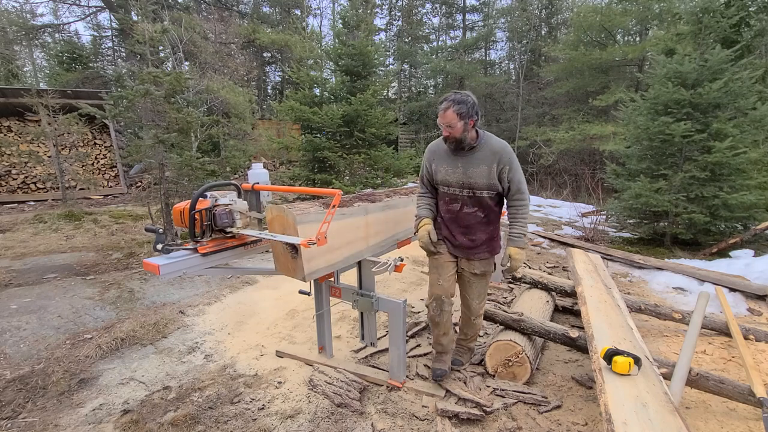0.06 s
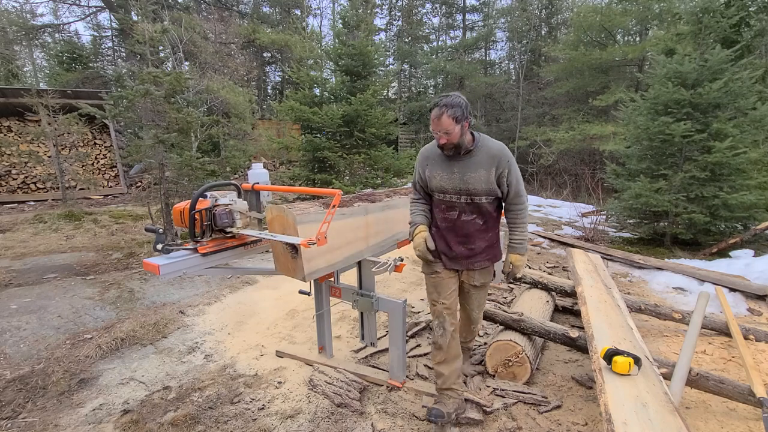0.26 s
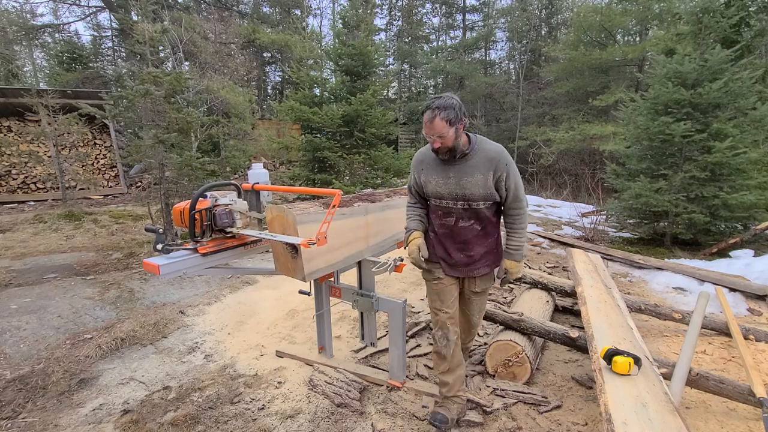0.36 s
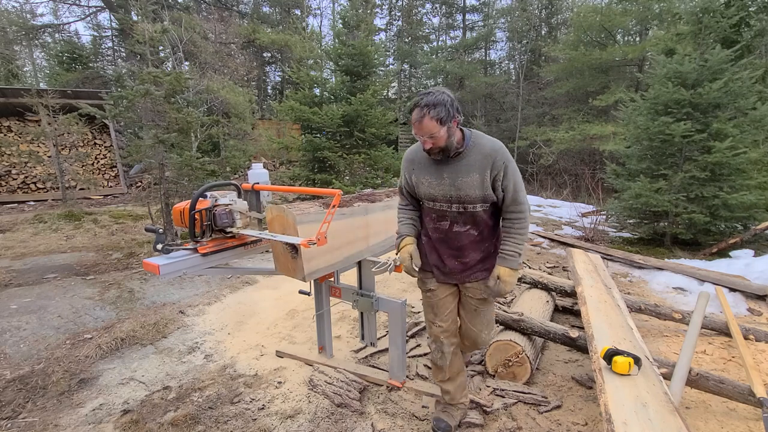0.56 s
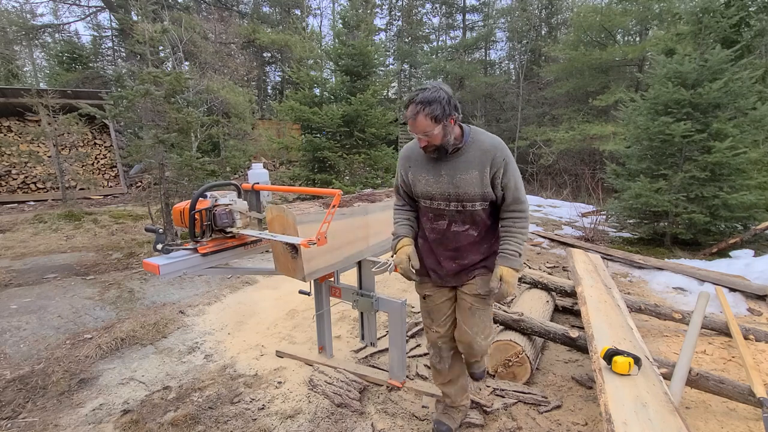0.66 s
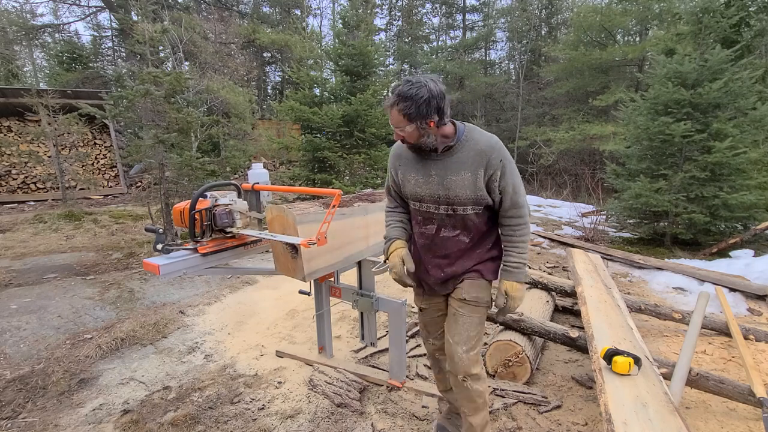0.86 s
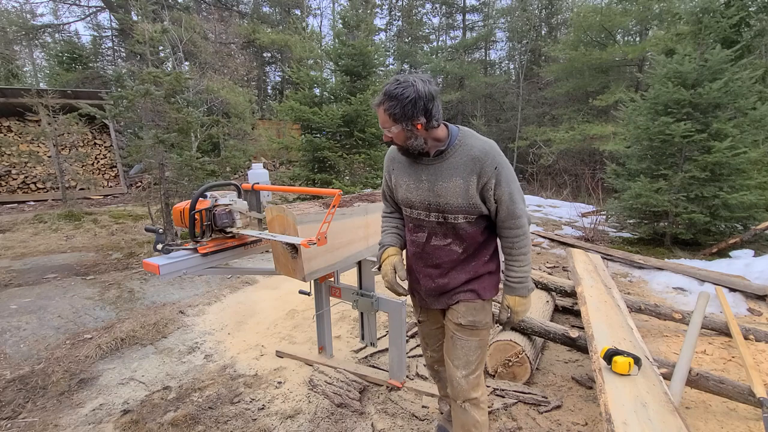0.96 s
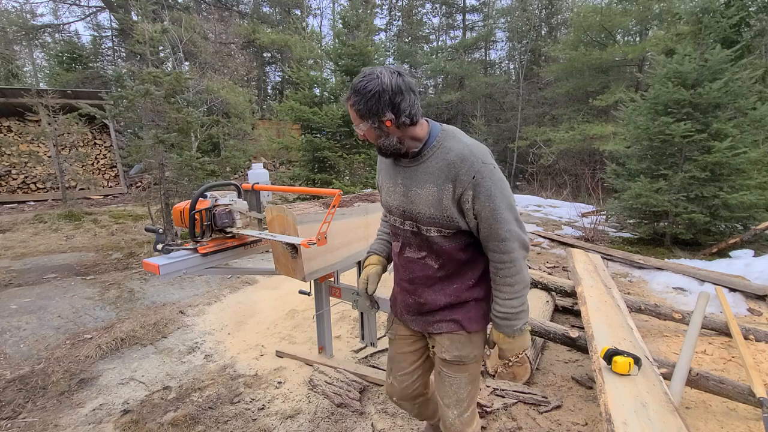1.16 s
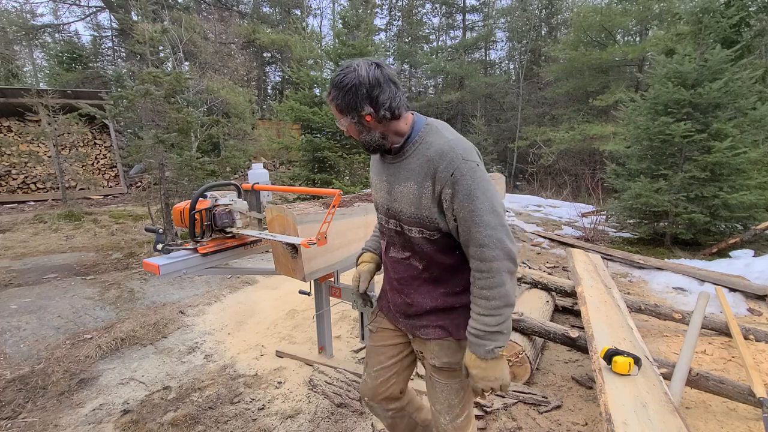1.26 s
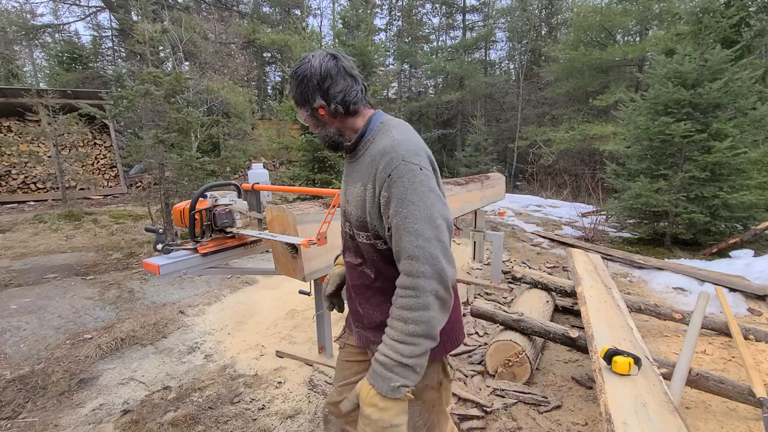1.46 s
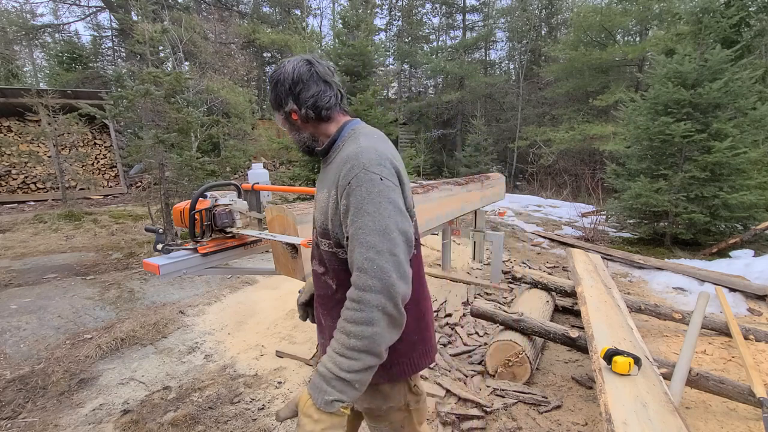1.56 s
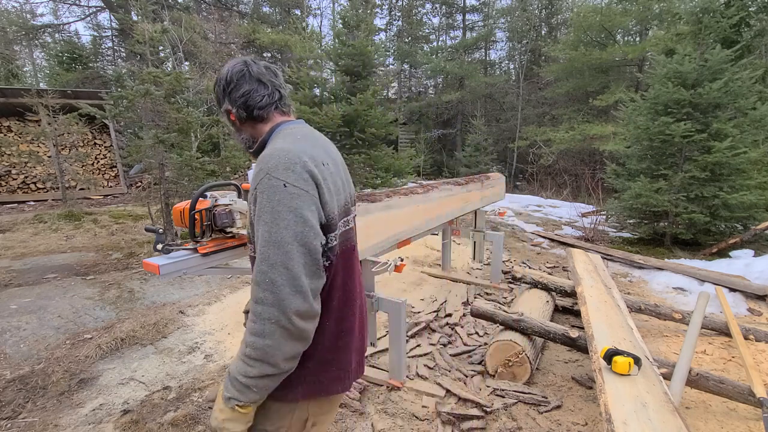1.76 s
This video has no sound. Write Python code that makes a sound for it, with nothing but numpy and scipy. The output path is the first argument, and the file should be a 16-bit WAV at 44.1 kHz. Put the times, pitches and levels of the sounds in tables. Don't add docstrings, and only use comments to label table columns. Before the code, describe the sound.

Footsteps on wood scraps in a quiet forest yard, starting with a sharp woody knock and rattle.

```python
import sys
import numpy as np
from scipy import signal
from scipy.io import wavfile
from scipy.ndimage import uniform_filter1d, map_coordinates

SR = 44100
rng = np.random.default_rng(int(sys.argv[2]) if len(sys.argv) > 2 else 0)


def generate_wav(signal):
    frames = np.transpose(np.atleast_2d(signal))
    scaled = np.clip(frames, -1, 1) * 32767
    pcm = np.round(scaled).astype(np.int16)
    wavfile.write(sys.argv[1], SR, pcm)


def ratio(d):
    e = np.asarray(d, float) / 20
    return 10 ** e


N = 79380

OPPOSITE = np.array([[1], [-1]])
PORT_HZ, PORT_WIDTH_HZ, PORT_DB = 8600, 3000, -5


def band(x, hz, width):
    return signal.lfilter(*signal.iirpeak(min(hz, .44 * SR), max(hz / width, .3), fs=SR), x)


def low_pass(x, order, hz):
    return signal.lfilter(*signal.butter(order, hz, fs=SR), x)


def high_pass(x, order, hz):
    return signal.lfilter(*signal.butter(order, hz, "high", fs=SR), x)


def port_dip(x, width):
    return x + (ratio(PORT_DB) - 1) * band(x, PORT_HZ, width)


def add(track, s, grain):
    i = int(s * SR)
    track[i:i + len(grain)] += grain[:N - i]


def ring(s, hz, t60):
    wood_cycles, wood_extra_s = 30, .006
    t = np.arange(int(.2 * SR)) / SR - (s * SR % 1) / SR
    t = np.maximum(t, 0)
    t60 = np.clip(t60, .002, wood_cycles / hz + wood_extra_s)
    return np.sin(2 * np.pi * hz * t) * ratio(-60 * t / t60)


def struck(hits, modes):
    out = np.zeros(N)
    for s, db, hardness_hz in hits:
        body = sum(ratio(mode_db) * ring(s, hz, t60) for hz, mode_db, t60 in modes)
        add(out, s, ratio(db) * low_pass(body, 2, min(hardness_hz, .44 * SR)))
    return high_pass(out, 2, modes[0][0] * .45)


# (time [s], level [dB], hardness as cut-off [Hz])
KICK_HITS = [
    (.21158, -13, 6130),
    (.21303, -11.5, 2840),
    (.2185, -30, 3500),
    (.2245, -31, 2500),
    (.2295, -31, 2500),
]
# (frequency [Hz], level [dB], t60 [s])
OFFCUT_MODES = [(716, -5.5, 0.028), (3000, -18, 0.0059), (982, -5, 0.041), (1234, -7, 0.01),
                (1703, 4, 0.014), (2045, -16, 0.025), (2150, -13, .03), (2617, -14.5, 0.03),
                (3450, -10, 0.02), (3830, -21, .02), (4800, -24, 0.011), (5760, -5, .02),
                (6300, -10.5, 0.0056), (6500, -12, 0.0055)]


def kicked_offcut():
    return struck(KICK_HITS, OFFCUT_MODES)


# (time [s], level [dB], hardness as cut-off [Hz])
BOUNCE_HITS = [
    (.2977, -28.5, 9000),
    (.2995, -37, 2720),
    (.3030, -37, 3500),
    (.3046, -35.5, 3000),
    (.3060, -31, 3000),
    (.3075, -39, 5000),
    (.3092, -40.5, 2500),
]
# (frequency [Hz], level [dB], t60 [s])
STICK_MODES = [(507, -16, 0.066), (630, -15, 0.02), (1150, -8.5, 0.012), (1420, -21, 0.013),
               (1640, -4, 0.03), (1935, 0, 0.035), (2500, -10, .02), (2960, -1, 0.018), (3230, -1, 0.017),
               (3850, 7, 0.0075), (4500, -11, 0.0057), (8500, -8, .004)]


def bouncing_offcut():
    return struck(BOUNCE_HITS, STICK_MODES)


# (time [s], level [dB], pitch [Hz], t60 [s])
SOLE_THUDS = [(0.2, -32, 196, 0.023), (0.2114, -22.5, 189.5, 0.061), (0.2113, -25.5, 124, 0.072),
              (0.223, -40, 80.4, 0.13), (0.2133, -31, 330, 0.022), (0.9418, -30.5, 250, 0.015),
              (0.959, -30.5, 295, 0.012), (0.9655, -25, 161, 0.012), (0.988, -36, 198, 0.011),
              (1.0795, -38, 406, 0.066), (1.4911, -36.5, 284, 0.026), (1.5128, -34, 116, 0.13),
              (1.5536, -18.5, 340, 0.012), (1.5598, -13.5, 268, 0.011), (1.5643, -39, 315, 0.062),
              (1.556, -27.5, 131, 0.046), (1.652, -41, 318, 0.051), (1.657, -42.5, 161, 0.068),
              (1.687, -25, 460, 0.007)]


def sole_thuds():
    out = np.zeros(N)
    for s, db, hz, t60 in SOLE_THUDS:
        add(out, s, -ratio(db) * ring(s, hz, t60))
    return out


# (time [s], level [dB], pitch [Hz], t60 [s])
STICK_TAPS = [(.270, -42.5, 1620, 0.0095), (0.4767, -38.5, 960, 0.041), (.4766, -32.5, 1770, 0.017),
              (.5415, -41.5, 11200, .015), (0.5463, -47, 11800, .012), (0.8286, -28, 2216, 0.011),
              (0.8293, -33.5, 1430, 0.0099), (.986, -39.5, 2045, 0.042), (1.0266, -37.5, 900, 0.019),
              (1.069, -39.5, 730, 0.025), (1.4939, -33, 1370, 0.017), (1.497, -36, 694, 0.036),
              (1.4983, -44, 1940, 0.023), (1.5135, -42, 1510, .02), (1.5547, -29, 1600, 0.017),
              (1.5549, -37, 457, 0.023), (1.5523, -28, 1370, 0.024), (1.5562, -31, 1026, 0.068),
              (1.56, -36, 1740, 0.018), (1.5611, -29.5, 1890, 0.02), (1.564, -33.5, 779, 0.048),
              (1.5523, -34, 2880, .018), (1.5608, -34, 2860, .02), (1.5631, -32.5, 2820, .016),
              (1.5537, -31.5, 1860, .012), (1.5592, -37, 5700, .011), (1.69, -51, 2580, .015),
              (1.6555, -42, 774, 0.037), (.992, -39.5, 1820, 0.011), (1.0272, -40.5, 1560, 0.016),
              (1.0765, -44.5, 2850, 0.0074), (1.6615, -57, 3780, 0.0093), (1.654, -31.5, 626, 0.013),
              (1.661, -46, 900, 0.054), (1.6905, -36, 1970, 0.025), (1.6929, -31.5, 1357, 0.026),
              (1.6954, -33.5, 1670, 0.014)]


def stick_taps():
    overtone, overtone_db = 1.29, -13.5
    out = np.zeros(N)
    for s, db, hz, t60 in STICK_TAPS:
        tap = ring(s, hz, t60)
        tap = tap + ratio(overtone_db) * ring(s, hz * overtone, t60 / overtone)
        add(out, s, ratio(db) * tap)
    return out


# (time [s], level [dB], centre [Hz], t60 [s])
GRIT_TICKS = [(0.2, -41, 11900, 0.02), (0.214, -27, 11500, 0.006), (.2145, -46, 12000, 0.024),
              (0.2692, -29.5, 8700, 0.018), (0.27, -44, 12400, 0.077), (0.2977, -19, 8550, 0.0045),
              (0.2974, -24.5, 4480, 0.0036), (.2974, -24.5, 11500, .004), (.3072, -31, 4500, 0.0097),
              (0.3564, -45, 10070, 0.018), (.393, -47, 12000, 0.028), (0.4747, -37.5, 4420, 0.021),
              (0.542, -45, 10900, 0.011), (0.4736, -54, 11000, 0.013), (.7745, -43, 10000, 0.0072),
              (0.7884, -32.5, 6750, .008), (.7965, -37, 6500, .008), (.800, -39, 8000, .008),
              (.8365, -37, 8000, 0.0092), (0.8255, -23, 7800, 0.0062), (0.8291, -29, 8400, 0.0051),
              (.7935, -37, 10600, 0.014), (0.803, -41, 9400, .012), (0.942, -46, 14000, 0.009),
              (0.98, -35, 5000, .008), (0.99, -41, 6000, .01), (1.0758, -40, 6500, .008),
              (0.967, -31.5, 8850, 0.0077), (0.983, -42, 12000, .01), (1.009, -41.5, 14000, 0.011),
              (1.077, -52, 11600, 0.031), (1.4925, -40.5, 9800, 0.018), (1.542, -51, 13000, .03),
              (1.5528, -23.5, 11100, 0.024), (1.5535, -29, 7200, 0.0099), (1.6533, -48, 11500, .01),
              (1.661, -50, 12000, .01), (1.5592, -28, 6040, 0.018), (1.6688, -39.5, 13000, .01),
              (1.6881, -40, 14500, 0.0091), (1.6885, -43, 6500, .008), (1.6914, -40, 14500, 0.01)]


def grit_ticks():
    snap, width = 0.82, .9
    out, t = np.zeros(N), np.arange(4000) / SR
    for s, db, hz, t60 in GRIT_TICKS:
        burst = rng.standard_normal(len(t)) + snap * (t == 0)
        crack = band(burst * ratio(-60 * t / t60), hz, hz * width)
        add(out, s, ratio(db) * high_pass(crack, 4, hz * .7))
    return out


# (start [s], length [s], level [dB], centre [Hz])
SAWDUST_SCUFFS = [(0.2111, 0.003, -25, 3750), (0.213, 0.023, -52, 4100), (0.27, 0.0037, -44.5, 2500),
                  (0.304, 0.0061, -54, 3900), (0.774, 0.058, -61.5, 10500), (0.788, 0.025, -50, 2090),
                  (0.829, 0.027, -62.5, 9100), (0.94, 0.052, -67.5, 9000), (1.49, 0.019, -53.5, 1430),
                  (1.54, 0.028, -53.5, 12600), (1.558, 0.014, -53, 2960), (1.656, 0.025, -63.5, 2320),
                  (1.68, 0.018, -65, 12000), (1.683, 0.012, -48.5, 1410), (0.975, 0.015, -69, 2460)]


def sawdust_scuffs():
    grains_per_s, scatter_db, width = 6000, 2.2, 1.0
    out, t = np.zeros(N), np.arange(4000) / SR
    for s, length, db, hz in SAWDUST_SCUFFS:
        chance, sign, strength = rng.random((3, len(t)))
        grains = (chance < grains_per_s / SR) * np.sign(sign - .5)
        grains = grains * ratio(-scatter_db * np.log(strength + 1e-9))
        for _ in range(2):
            grains = band(grains, hz, hz * width)
        push = np.clip(t / length, 0, 1)
        pressure = push ** 0.065 * (1 - push) ** 0.16
        add(out, s, ratio(db) * grains / grains.std() * 2 * pressure)
    return out


def grit():
    return port_dip(grit_ticks() + sawdust_scuffs(), PORT_WIDTH_HZ)


def grit_spread():
    return ratio(-7.5) * high_pass(grit(), 2, 1000) * OPPOSITE


# (time [s], left lag [samples], left minus right [dB])
WALKER_PATH = [
    (0, 4.56, -1.6),
    (.9, 5.4, -1.9),
    (1.5, 0.53, 1),
    (1.8, .8, .4),
]


def at_two_ports(feet):
    shadow_hz, shadow_width_hz, shadow_db = 8500, 5000, -8
    n, path = np.arange(N), np.array(WALKER_PATH)
    lag, pan_db = (np.interp(n / SR, path[:, 0], path[:, k]) for k in (1, 2))
    left = map_coordinates(feet, [n - lag], mode="nearest")
    treble = band(left, shadow_hz, shadow_width_hz)
    left = left + (ratio(shadow_db * lag / path[0, 1]) - 1) * treble
    return np.array([left * ratio(pan_db / 2), feet * ratio(-pan_db / 2)])


def yard_scatter(feet):
    level_db, t60_s, top_hz, alike_hz = -16, .06, 9000, 900
    t = np.arange(6000) / SR
    tail = rng.standard_normal((2, len(t))) * ratio(-60 * t / t60_s)
    tail = tail * np.clip(t / 0.0012, 0, 1)
    tail = tail[0] + high_pass(tail[1], 2, alike_hz) * OPPOSITE
    tail = low_pass(tail, 1, top_hz)
    tail = tail / np.sqrt((tail ** 2).sum(axis=1, keepdims=True))
    return ratio(level_db) * signal.fftconvolve(feet[None], tail, axes=1)[:, :N]


def wander(rate):
    k = int(SR / rate)
    held = np.repeat(rng.standard_normal(N // k + 1), k)
    return 0.51 * uniform_filter1d(uniform_filter1d(held, k), k)[:N]


# (frequency [Hz], level per Hz [dB])
TREE_TONE = [(75, -13), (190, -1.5), (480, 1), (1100, -8), (2200, -10), (7200, -24.5), (8300, -34.5),
             (15500, -28)]
# (frequency [Hz], likeness of left and right [-1 to 1])
TREE_LIKENESS = [(60, 0.31), (130, 0.97), (290, 0.83), (640, 0.38), (1410, -0.025), (3100, -0.096),
                 (6820, 0.097), (15000, -0.029)]


def trees():
    level_db, swell_db, flicker_db = -48.5, -0.35, 1.6
    tone, likeness = np.array(TREE_TONE), np.array(TREE_LIKENESS)
    out, swell = 0, wander(3.7)
    for hz in 22 * 2 ** np.arange(0, 9.6, 1 / 3):
        mid, side = (band(band(rng.standard_normal(N), hz, hz / 3), hz, hz / 3) for _ in range(2))
        alike = np.interp(np.log(hz), np.log(likeness[:, 0]), likeness[:, 1])
        alike = np.clip(alike, -.9, .99)
        db = np.interp(np.log(hz), np.log(tone[:, 0]), tone[:, 1])
        db = db + swell_db * swell + flicker_db * wander(9.1)
        out = out + ratio(db) * (np.sqrt(1 + alike) * mid + np.sqrt(1 - alike) * side * OPPOSITE)
    out = port_dip(out, PORT_WIDTH_HZ / 2)
    return ratio(level_db) * out / out.std()


def scene():
    feet = kicked_offcut() + bouncing_offcut() + sole_thuds() + stick_taps() + grit()
    feet = high_pass(feet, 3, 72)
    return at_two_ports(feet) + grit_spread() + yard_scatter(feet) + trees()


def band_limit(x):
    return signal.sosfilt(signal.butter(12, 16990, fs=SR, output="sos"), x)


def record(dry):
    top_cut = signal.ellip(10, .2, 70, 15750, fs=SR, output="sos")
    mix = signal.sosfilt(top_cut, dry)
    return band_limit(mix)


dry = scene()
out = record(dry)
generate_wav(out)
```